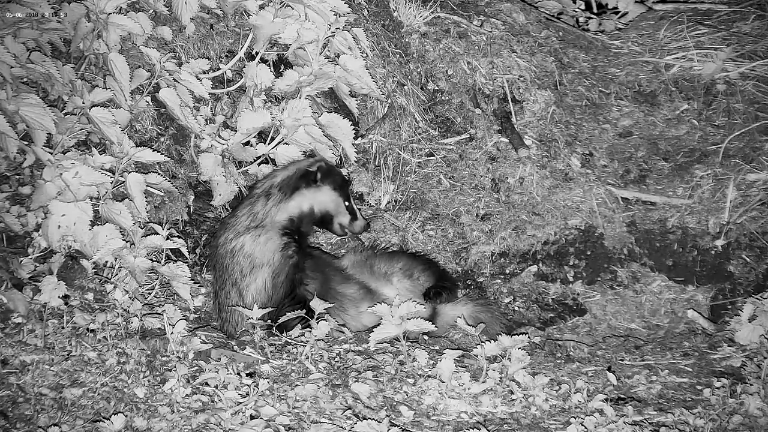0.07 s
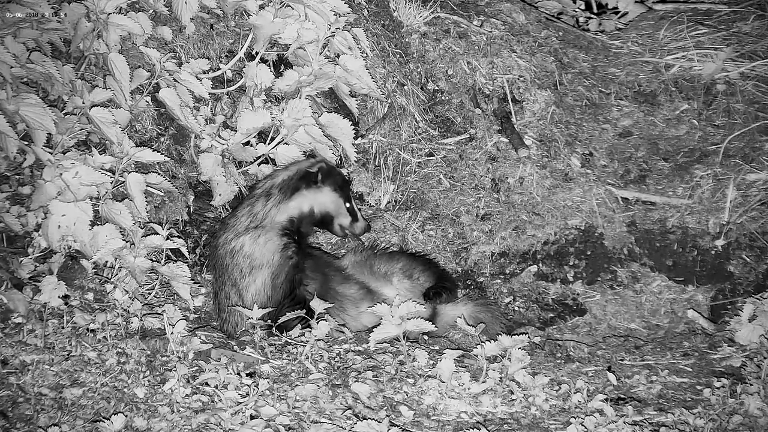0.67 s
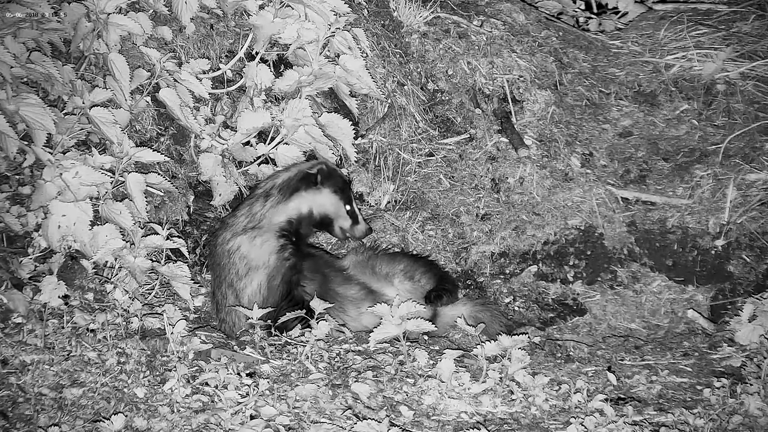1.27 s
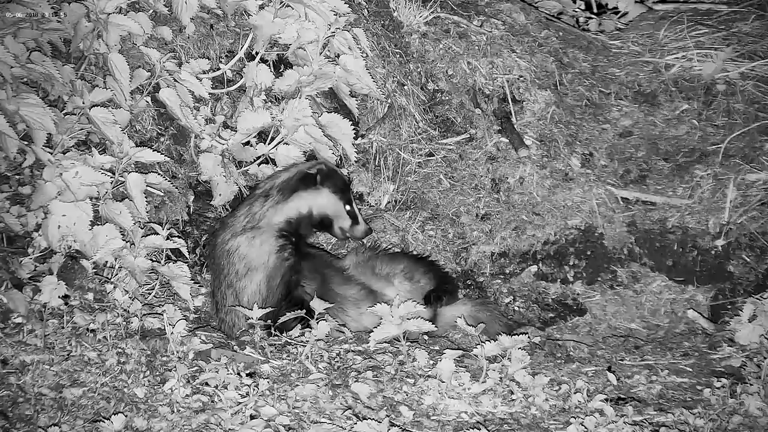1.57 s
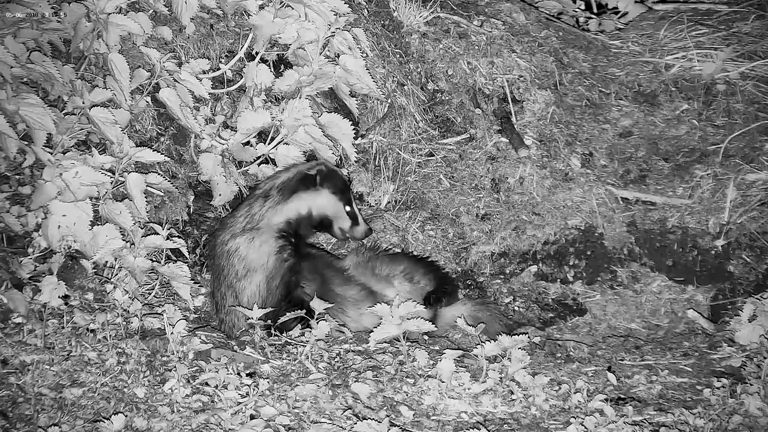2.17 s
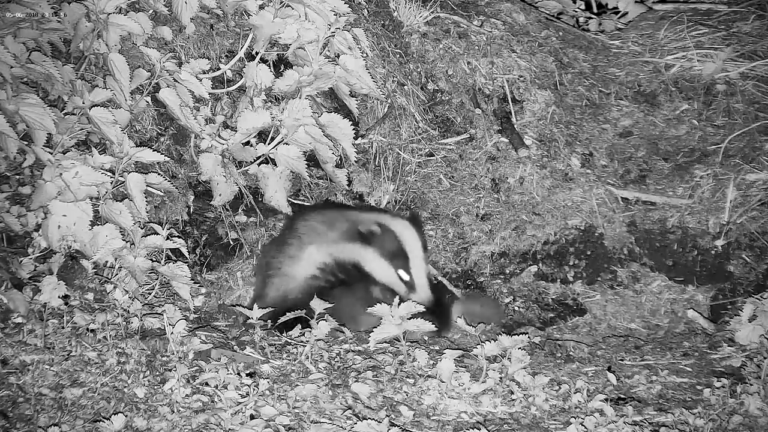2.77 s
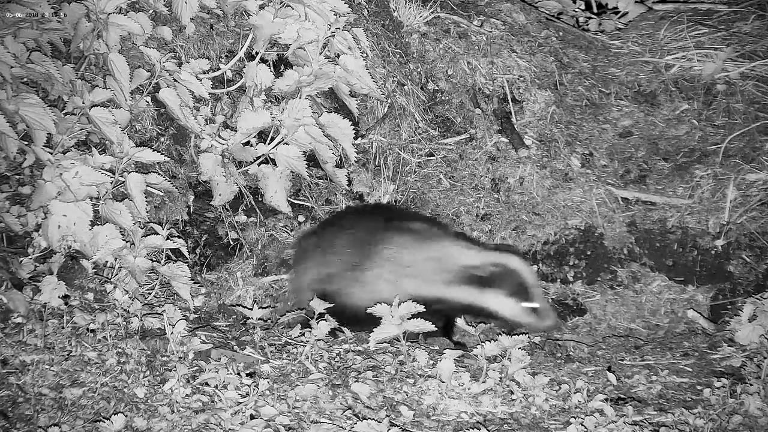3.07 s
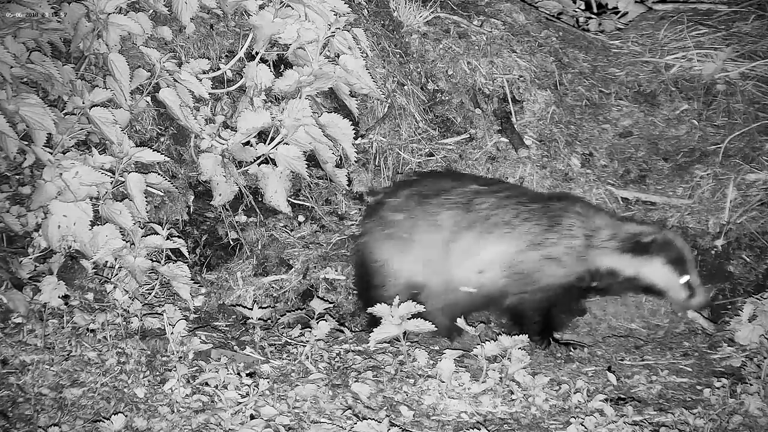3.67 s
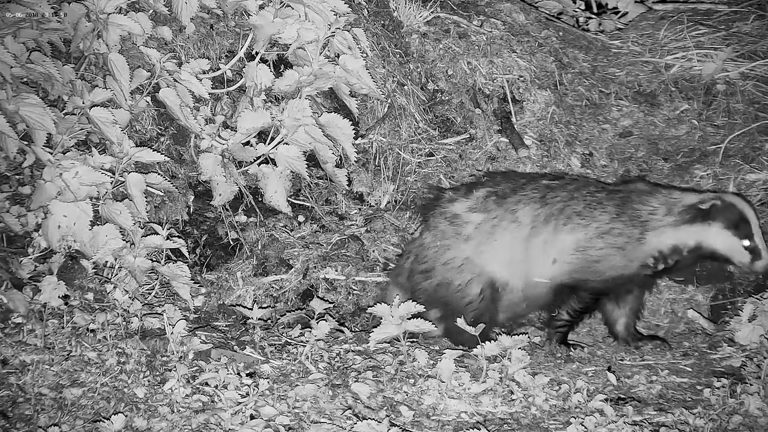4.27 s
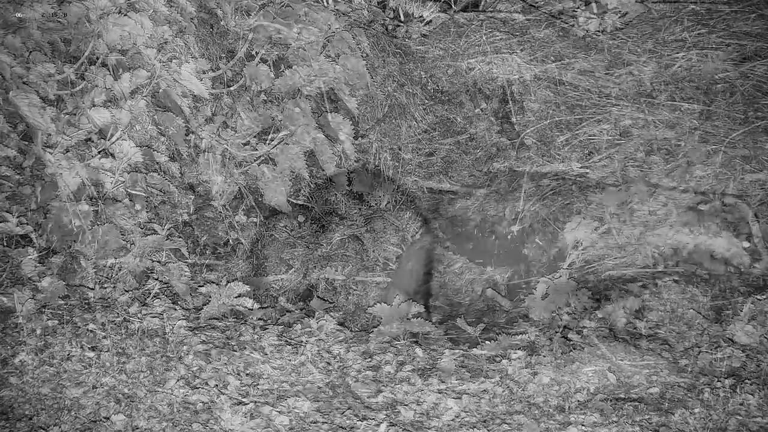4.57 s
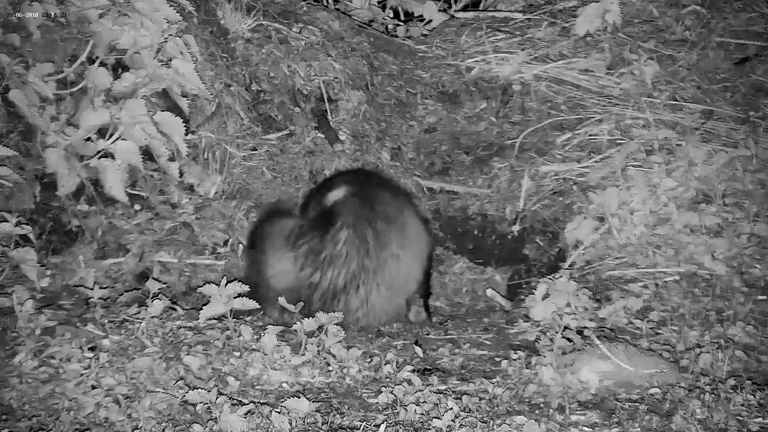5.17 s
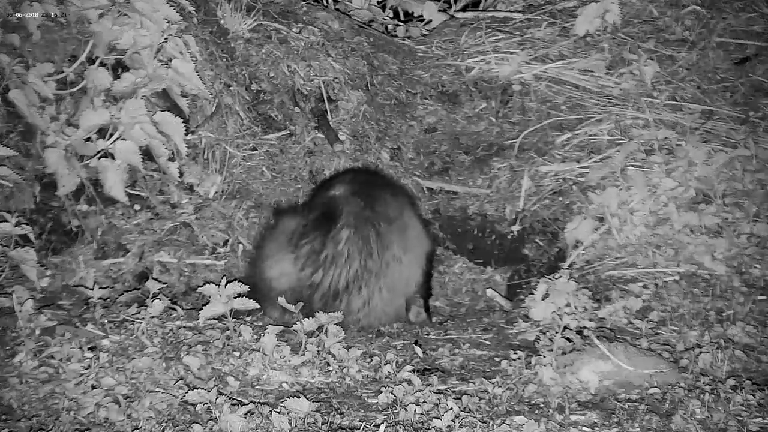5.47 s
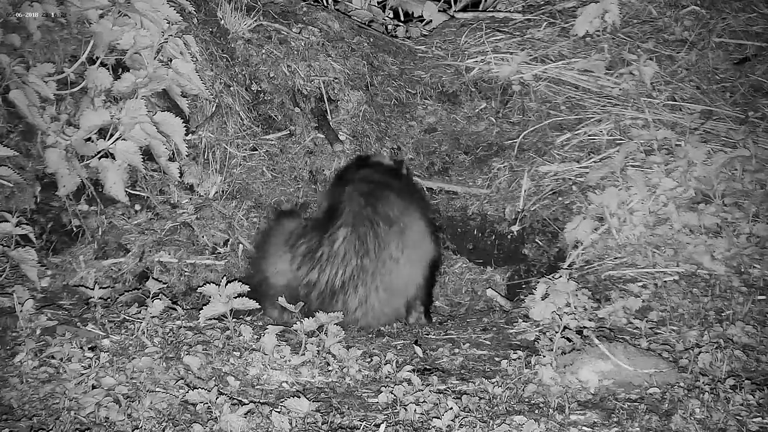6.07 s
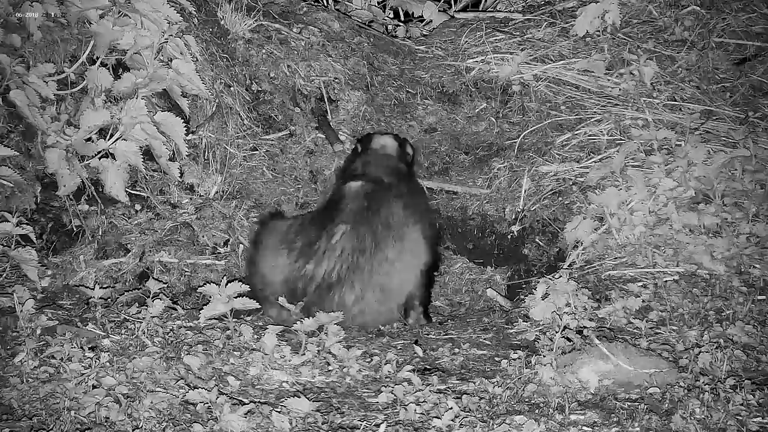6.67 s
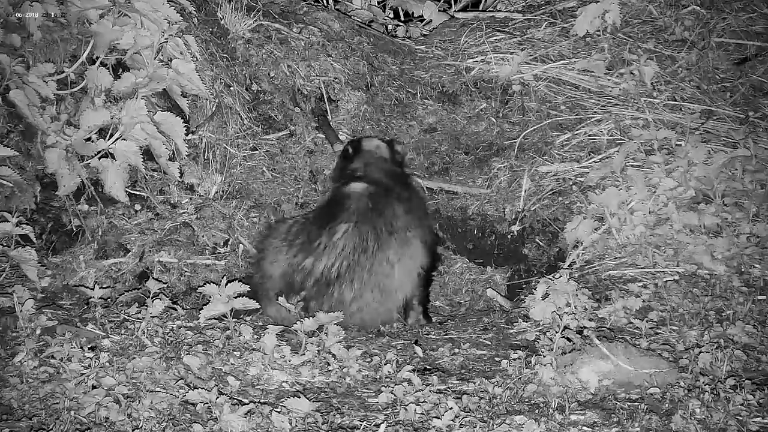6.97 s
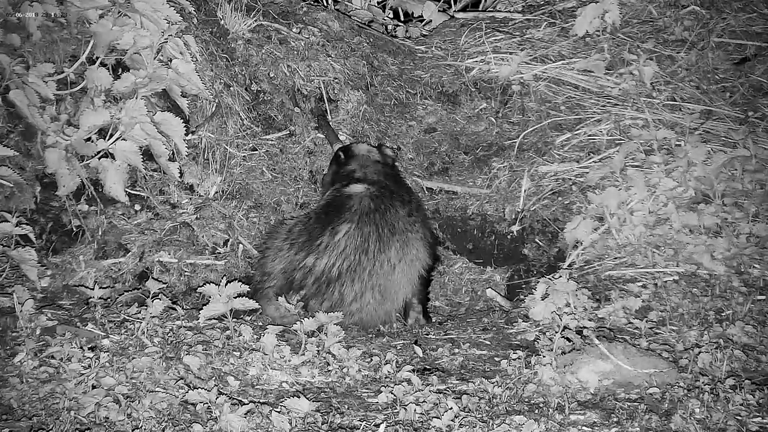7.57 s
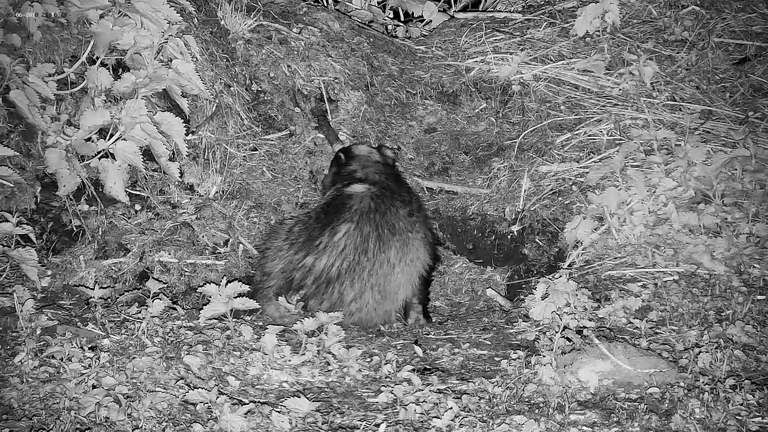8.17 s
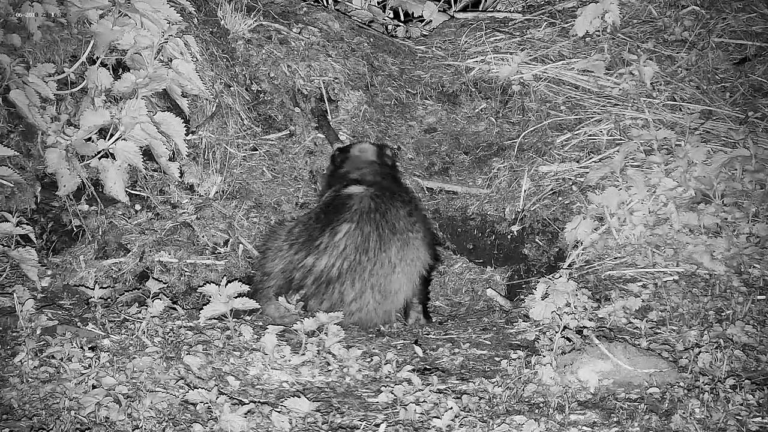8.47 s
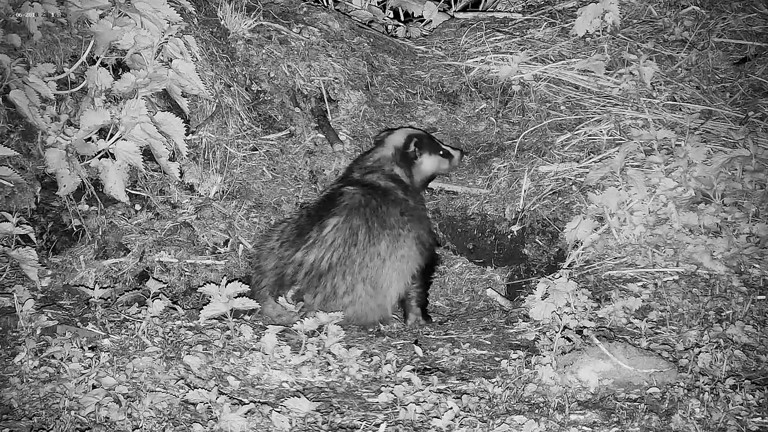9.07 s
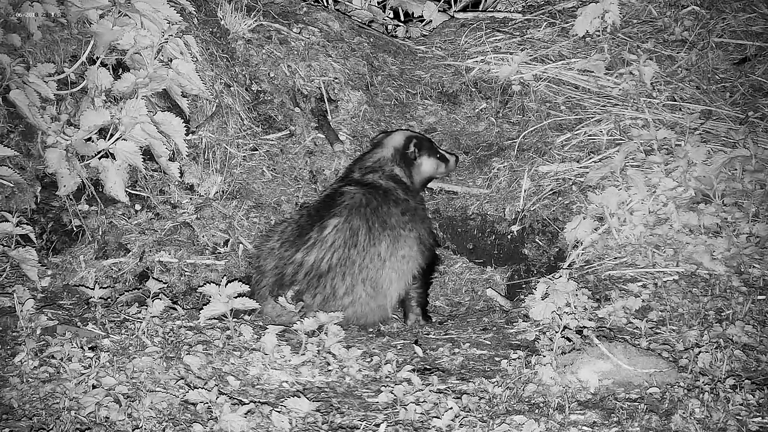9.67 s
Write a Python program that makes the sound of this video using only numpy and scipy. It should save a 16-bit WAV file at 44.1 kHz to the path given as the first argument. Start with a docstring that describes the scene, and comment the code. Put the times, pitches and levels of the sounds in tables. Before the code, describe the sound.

A deep rumble of faraway traffic, a wash of night air and a wildlife camera's steady hiss with a very faint whine fill all ten seconds. Distant engine drones fade in and out, each rising slightly in pitch. At about 2.4 seconds a badger shifts in dry leaves, with tiny sharp stalk snaps near 2.5 and 2.9 seconds. Faint rustles and scattered crackles continue as it walks, until nearly 6 seconds. From 4.4 to 5.8 seconds it scratches its fur in eight even, dry, ticking strokes, about five a second, then three more around 6 seconds. A soft, dull ground bump comes on the right at 6.5 seconds. Brief, blurred faraway tones appear near 4, 6.8 and 7.5 seconds. A last small rustle and a few snaps come at 8.8 seconds. The animal's sounds stay very faint, barely above the background.

```python
"""Badger in dry leaves at night

A badger shifts in the litter, walks off a few steps and scratches its fur with a hind foot. Each stroke
is a swell of tiny clicks from flicked hairs and leaf edges; dry stalks snap and the ground bumps twice.
It all barely clears the hiss of a wildlife camera, over a bed of night air and faraway traffic:
low rumble, climbing engine drones and a few blurred tones."""
import sys
import numpy as np
from scipy import signal
from scipy.fft import rfft, irfft, next_fast_len
from scipy.io import wavfile
from scipy.ndimage import uniform_filter1d

SR = 44100
rng = np.random.default_rng(int(sys.argv[2]) if len(sys.argv) > 2 else 0)


def generate_wav(sig):
    """Save sig (samples, or channels by samples) to the path in sys.argv[1] as 16-bit PCM at SR."""
    pcm = np.round(np.clip(np.atleast_2d(sig).T, -1, 1) * 32767).astype(np.int16)
    wavfile.write(sys.argv[1], SR, pcm)


N = 437031
TIME, FREQ = np.arange(N) / SR, np.fft.rfftfreq(N, 1 / SR)

# Hind-foot scratching. Each row: first stroke in seconds, stroke count, spacing in seconds, level in dB,
# tiring in dB per stroke, brightness in dB per octave.
SCRATCH_BOUTS = [(4.408, 8, .1864, -65.6, .15, -0.7), (5.922, 3, .187, -65.5, 1.3, -2.8)]
# Body and paws brushing the litter. Each row: middle in seconds, level in dB, half length in seconds,
# brightness in dB per octave.
LITTER_RUSTLES = [(2.425, -67.8, .052, -2), (2.917, -62.5, 0.011, 4), (3.0, -74, .079, 2),
                  (3.57, -72.5, 0.079, 2), (4.05, -72, .022, 3), (4.492, -72.5, 0.083, 0),
                  (8.785, -71.5, .02, -1.5)]
# Colour of fur and litter. Each row: frequency in Hz, relative level in dB.
FUR_COLOUR = [(600, -24), (1500, -7), (2500, -5.5), (3200, -2), (5000, -1.5), (6400, -1.5), (7600, -1),
              (9000, -2.5), (11000, -2.5), (13000, -8), (17000, -25)]
# Stalks and leaves snapping. Each row: start in seconds, attack level in dB, centre in Hz,
# decay in seconds.
STALK_SNAPS = [(2.4857, -47, 8800, .001), (2.497, -59, 5200, .002), (2.9338, -56, 4000, .0015),
               (2.9342, -43, 10100, .0007), (8.7735, -59, 6000, .003), (8.7975, -53, 5070, .0024),
               (8.843, -55, 2600, .002)]
# Colour of a snap. Each row: multiple of its centre frequency, relative level in dB.
SNAP_COLOUR = [(.1, -40), (.5, -13), (.72, -2), (1.15, 0), (1.32, -16), (1.7, -40)]
# Soft knocks on the ground. Each row: start in seconds, gain in dB.
GROUND_KNOCKS = [(2.83, -13), (6.49, 0)]
# The ring of a knock. Each row: frequency in Hz, relative level in dB, seconds to fall by 60 dB.
KNOCK_MODES = [(160, -43, .016), (325, -38, .022), (405, -35, .03)]
# Far engines pulling up in speed. Each row: start and end in seconds, first and last pitch in Hz,
# midway level in dB, growth from start to end in dB.
ENGINE_PULLS = [(.2, 2.2, 55.5, 58, -52.5, 1), (1.35, 2.88, 122.9, 127.5, -54.5, 5.5),
                (3.2, 4.25, 44.09, 59.97, -42, -0.5), (4.6, 8.2, 37.94, 46.01, -48.5, 4.5),
                (6.55, 8.2, 82.25, 82.3, -51, -3), (8.3, 9.88, 83.17, 86.46, -45, -0.5)]
# Faraway notes. Each row: middle in seconds, pitch in Hz, level in dB, half length in seconds.
FAR_NOTES = [(1.6, 954, -76, 1.2), (4.01, 620, -52.5, .036), (4.189, 721, -66.5, .07),
             (6.828, 440, -59.5, .062), (7.546, 335.4, -62, .3)]
# Colours of the beds: far roads, bright night air, dull night air and microphone amplifier hiss.
# Each row: frequency in Hz, relative level in dB.
ROAD_COLOUR = [(8, -13.5), (15, -1.5), (30, -5), (42, 1), (55, -3.5), (90, -6.5), (150, -17), (260, -24.5),
               (400, -53.5)]
BRIGHT_AIR_COLOUR = [(60, -23), (150, -12), (240, -1.5), (320, 2.5), (450, 1), (650, -0.5), (800, -1.5),
                     (950, -3.5), (1150, -7.5), (1330, -6), (1500, -12), (2000, -20.5), (3000, -27.5),
                     (16000, -75)]
DULL_AIR_COLOUR = [(60, -27), (150, -16.5), (235, -3), (310, 4), (450, 0), (650, -0.5), (800, -4),
                   (950, -5.5), (1150, -8), (1330, -7.5), (1500, -12.5), (2000, -21), (3000, -28),
                   (16000, -76)]
HISS_COLOUR = [(300, 5), (2000, -2.5), (4000, -6), (7500, -11), (10000, -9), (12500, -5.5), (15500, 0.5),
               (16500, -27), (18000, -14)]
# The camera's electrical whine. Each row: frequency in Hz, level in dB before panning.
WHINE_TONES = [(1536, -85.5), (1824, -93), (1921.5, -81), (2306, -87), (2785, -92)]
# Dips in the camera's response. Each row: centre in Hz, half width in Hz, depth from 0 to 1.
CAMERA_NOTCHES = [(478, 15, .85), (1250, 36, .78), (1888, 22, .7)]
# Likeness of the two microphone ports. Each row: frequency in Hz, correlation from -1 to 1.
PORT_LIKENESS = [(30, .94), (45, .94), (65, .72), (85, .52), (110, -.03), (180, -.24), (350, -.5),
                 (600, -.58), (1000, -.55), (1330, -.75), (3000, -.6), (5000, -.15)]
# Phase between the ports. Each row: frequency in Hz, lead of the left in radians.
PORT_LEAD = [(30, -0.37), (55, -0.31), (85, -0.66), (120, -0.062), (300, 0.11), (1000, -0.086)]
# Balance of the ports. Each row: frequency in Hz, left over right in dB.
PORT_BALANCE = [(30, .4), (70, 1.1), (125, -.6), (250, 1.2), (600, 2.4), (1000, .8), (1400, -2), (3000, -1),
                (5000, 0)]

MOVE_START_S, MOVE_END_S = 2.25, 5.8  # the badger is on the move


def scratches(half_s=.018, ease_db=1, bright_spread_db=1.0):
    """The hind foot beats evenly, easing at both ends of a bout and tiring. Gives rustle rows."""
    rows = []
    for first, count, period, db, tiring_db, bright_db in SCRATCH_BOUTS:
        for k, place in enumerate(np.linspace(-1, 1, count)):
            level = db - tiring_db * k - ease_db * place ** 2
            brightness = bright_db + bright_spread_db * rng.standard_normal()
            rows.append((first + k * period, level, half_s, brightness))
    return rows


def strokes(grain_db=.5, grains_per_s=5000, bleed=.15):
    """Each pass of claws or body flicks many hairs and leaf edges: a short swell of tiny clicks."""
    out, t = np.zeros((2, N)), np.arange(-8192, 8192) / SR
    for middle, db, half, bright_db in LITTER_RUSTLES + scratches():
        size = gain_of(grain_db * np.minimum(rng.exponential(1, (2, len(t))), 4))
        clicks = size * rng.choice([-1, 1], size.shape) * (rng.random(size.shape) < grains_per_s / SR)
        colour = [(hz, level + bright_db * np.log2(hz)) for hz, level in FUR_COLOUR]
        rustle = coloured(clicks + bleed * clicks[::-1], colour)
        swell = np.exp(-.5 * (t / half) ** 2)
        add(out, middle + t[0], gain_of(db) * rustle * swell)
    return out


def crackles(count=10, db=-62, hz=6800, spread_octaves=.25, decay_s=.0008):
    """The litter crackles at random under the moving badger. Gives snap rows."""
    starts = rng.uniform(MOVE_START_S, MOVE_END_S, count)
    centres = hz * 2 ** rng.uniform(-spread_octaves, spread_octaves, count)
    return [(start, db, centre, decay_s) for start, centre in zip(starts, centres)]


def snaps():
    """Dry fibres break, each a burst of a few milliseconds in one broad band."""
    out, t = np.zeros((2, N)), np.arange(1024) / SR
    for start, db, hz, decay in STALK_SNAPS + crackles():
        colour = [(hz * multiple, level) for multiple, level in SNAP_COLOUR]
        crack = coloured(rng.standard_normal((2, len(t))), colour)
        add(out, start, gain_of(db) * crack * np.exp(-t / decay))
    return out


def coat(db=-78.5, uneven_db=2.5, fade_s=.2):
    """The coat brushes faintly and unevenly through the plants while the badger moves."""
    level = faded(MOVE_START_S, MOVE_END_S, fade_s) * gain_of(db + uneven_db * drift(14))
    return level * coloured(rng.standard_normal((2, N)), FUR_COLOUR)


def knocks(pan_right_db=7.5, contact_s=.003):
    """Dull, heavily damped bumps on the ground; the soft contact rounds off the top end."""
    out, t = np.zeros((2, N)), np.arange(4096) / SR
    ring = sum(gain_of(db - 60 * t / t60) * np.sin(2 * np.pi * hz * t) for hz, db, t60 in KNOCK_MODES)
    contact = np.hanning(round(contact_s * SR))
    bump = -np.convolve(ring, contact / contact.sum())
    for start, db in GROUND_KNOCKS:
        add(out, start, bump * gain_of([[db - pan_right_db], [db + pan_right_db]]))
    return out


def road_rumble(db=-42, heave_db=.24):
    """Far roads lay down a deep bed of noise, held level apart from a slight heave."""
    noise = outdoor_field(ROAD_COLOUR, patchy_db=1.0)
    envelope = np.sqrt(uniform_filter1d((noise ** 2).mean(0), size=SR // 4))
    return noise / envelope * gain_of(db + heave_db * drift(3))


def engine_drones(waver_hz=.31, flutter_db=1.34, fade_s=.14, climb_power=1.25):
    """Exhaust notes of far engines fade in, climb in pitch and fade out."""
    out = np.zeros((2, N))
    for start, end, first_hz, last_hz, db, growth_db in ENGINE_PULLS:
        progress = np.clip((TIME - start) / (end - start), 0, 1)
        hz = first_hz + (last_hz - first_hz) * progress ** climb_power
        phase = 2 * np.pi * np.cumsum(hz + waver_hz * drift(6)) / SR
        level = gain_of(db + growth_db * (progress - .5) + flutter_db * drift(7))
        out += tone_at_ports(phase, (first_hz + last_hz) / 2) * faded(start, end, fade_s) * level
    return out


def far_tones(waver_hz=20, flutter_db=3.0):
    """Blurred, unsteady notes swell and fade a long way off."""
    out, waver, flutter = np.zeros((2, N)), waver_hz * drift(90), flutter_db * drift(9)
    for middle, hz, db, half in FAR_NOTES:
        span = abs(TIME - middle) < 4 * half
        tone = tone_at_ports(2 * np.pi * np.cumsum(hz + waver[span]) / SR, hz)
        swell = np.exp(-.5 * ((TIME[span] - middle) / half) ** 2)
        out[:, span] += tone * swell * gain_of(db + flutter[span] - flutter[span].mean())
    return out


def night_air(db=-57.4, flutter_db=.5, dull_at_s=4.75, crossfade_s=.86):
    """A distant wash flutters a little and crossfades to a duller colour halfway through."""
    blend = np.clip(.5 + (TIME - dull_at_s) / crossfade_s, 0, 1)
    bright = outdoor_field(BRIGHT_AIR_COLOUR, patchy_db=.24)
    dull = outdoor_field(DULL_AIR_COLOUR, patchy_db=.53)
    wash = np.sqrt(1 - blend) * bright + np.sqrt(blend) * dull
    return gain_of(db + flutter_db * drift(21)) * wash


def electronics(hiss_db=-64.5):
    """Wide, steady amplifier hiss and a thin whine, louder and flipped in polarity on the right."""
    whine = sum(gain_of(db) * np.sqrt(2) * np.sin(2 * np.pi * (hz * TIME + rng.random()))
                for hz, db in WHINE_TONES)
    hiss = gain_of(hiss_db) * coloured(rng.standard_normal((2, N)), HISS_COLOUR)
    return hiss + whine * np.array([[.65], [-1.3]])


def notched(x):
    """The camera's response carves narrow dips into the sound."""
    size = next_fast_len(N)
    hz = np.fft.rfftfreq(size, 1 / SR)
    dips = [1 - depth / (1 + ((hz - centre) / width) ** 2) for centre, width, depth in CAMERA_NOTCHES]
    return irfft(rfft(x, size) * np.prod(dips, axis=0), size)[:, :N]


def outdoor_field(colour, patchy_db):
    """Diffuse noise at the two ports, alike in the bass and opposed higher up, with drifting patches."""
    frames, hz = N // 1024 + 5, np.fft.rfftfreq(4096, 1 / SR)
    left_re, left_im, other_re, other_im, patches = rng.standard_normal((frames, len(hz), 5)).T
    patches = uniform_filter1d(patches, 12, axis=0, mode="wrap")  # smear across frequency
    patches = evened(uniform_filter1d(patches, 7, axis=1))  # and across time
    likeness = curve(PORT_LIKENESS, hz)[:, None]
    left = left_re + 1j * left_im
    right = likeness * left + np.sqrt(1 - likeness ** 2) * (other_re + 1j * other_im)
    pan = (gain_of(curve(PORT_BALANCE, hz) / 2) * np.exp(.5j * curve(PORT_LEAD, hz)))[:, None]
    level = gain_of(curve(colour, hz)[:, None] + patchy_db * patches)
    spectra = np.array([left * pan, right / pan]) * level
    return evened(signal.istft(spectra, nperseg=4096, noverlap=3072)[1][:, :N])


def tone_at_ports(phase, hz):
    """A faraway tone of rms 1 reaches the ports with a phase gap that depends on its pitch."""
    gap = np.arccos(curve(PORT_LIKENESS, hz))
    return np.sqrt(2) * np.array([np.sin(phase), np.sin(phase + gap)])


def coloured(x, colour):
    """Shapes x with an EQ curve, at rms 1."""
    size = next_fast_len(x.shape[-1])
    eq = gain_of(curve(colour, np.fft.rfftfreq(size, 1 / SR)))
    return evened(irfft(rfft(x, size) * eq, size)[..., :x.shape[-1]])


def drift(per_s):
    """Smooth random modulation of rms 1, passing per_s new values a second."""
    knots = rng.standard_normal(1024)
    return evened(uniform_filter1d(np.interp(TIME * per_s, np.arange(1024), knots), 801))


def faded(start, end, fade_s):
    """A gate with straight fades centred on its start and end."""
    return np.clip(.5 + np.minimum(TIME - start, end - TIME) / fade_s, 0, 1)


def curve(points, hz):
    """Joins points on a log-frequency axis."""
    point_hz, value = np.transpose(points)
    return np.interp(np.log(hz + 1), np.log(point_hz + 1), value)


def gain_of(db):
    """Decibels to amplitude."""
    return 10 ** (np.asarray(db) / 20)


def evened(x):
    """Scales to rms 1."""
    return x / np.sqrt(np.mean(x ** 2) + 1e-30)


def add(mix, start_s, sound):
    """Drops a stereo sound into the mix."""
    part = mix[:, round(start_s * SR):][:, :sound.shape[1]]
    part += sound[:, :part.shape[1]]


def scene():
    """The badger over the night bed."""
    bed = road_rumble() + engine_drones() + night_air() + far_tones()
    return strokes() + snaps() + coat() + knocks() + bed


def record(dry):
    """The camera adds its own noise, notches the sound and cuts the very top."""
    low_pass = signal.firwin(801, cutoff=15750, window=("kaiser", 9), fs=SR)
    return signal.oaconvolve(notched(dry + electronics()), low_pass[None], "same")


dry = scene()
out = record(dry)
generate_wav(out)
```